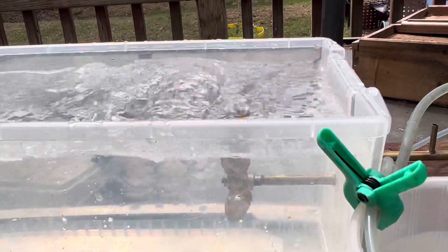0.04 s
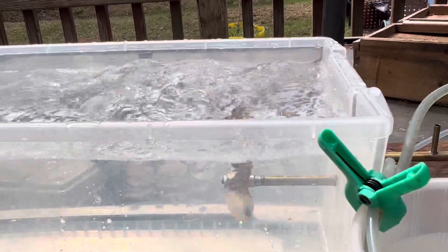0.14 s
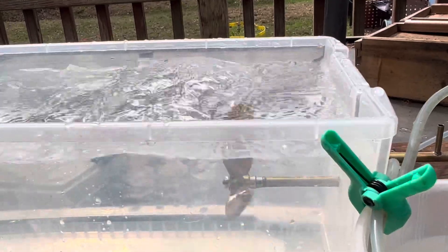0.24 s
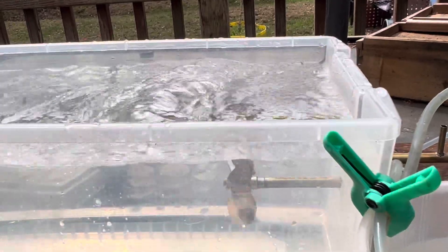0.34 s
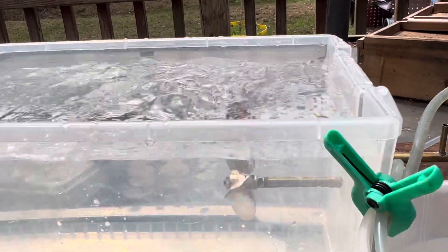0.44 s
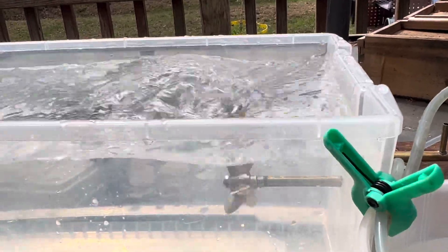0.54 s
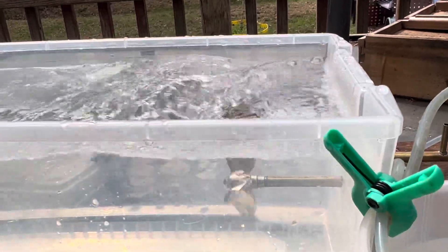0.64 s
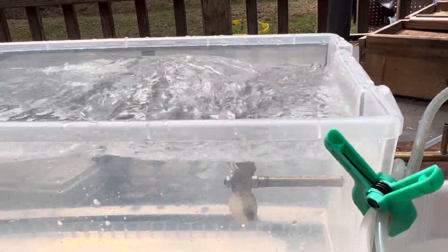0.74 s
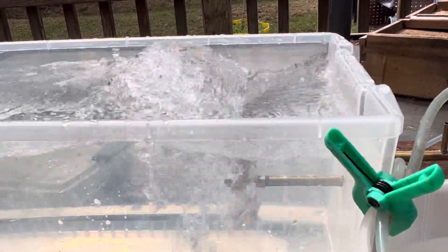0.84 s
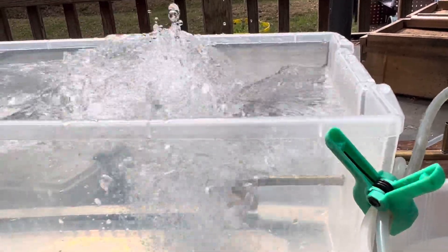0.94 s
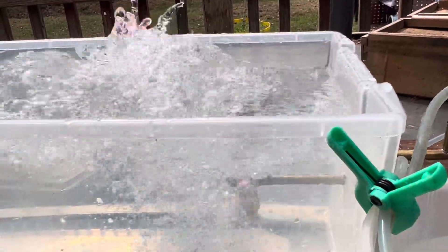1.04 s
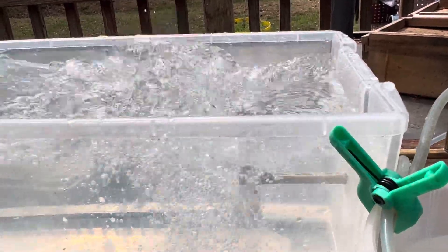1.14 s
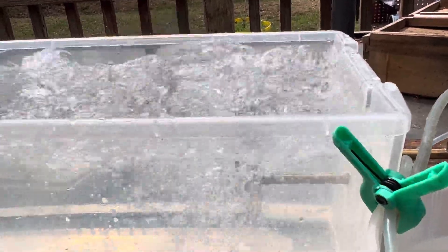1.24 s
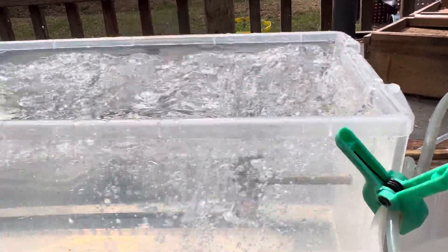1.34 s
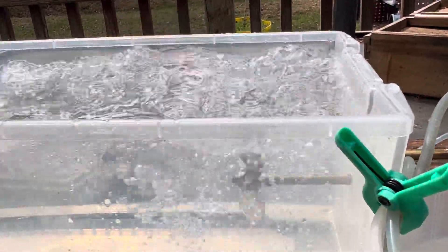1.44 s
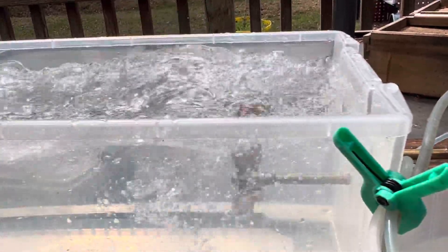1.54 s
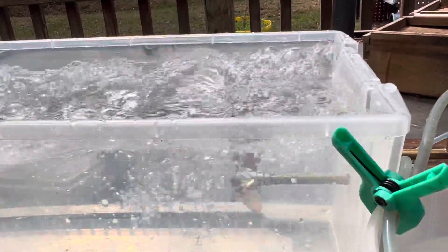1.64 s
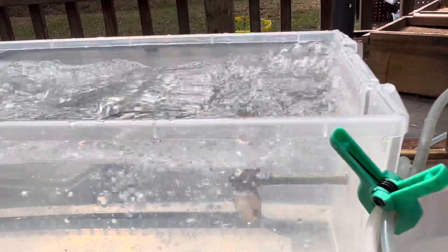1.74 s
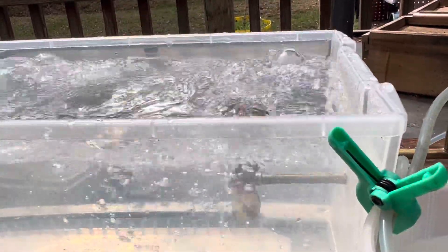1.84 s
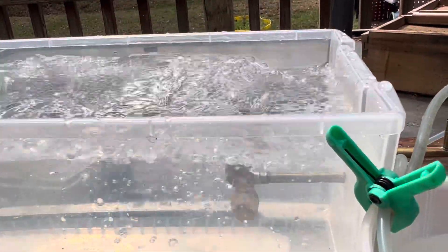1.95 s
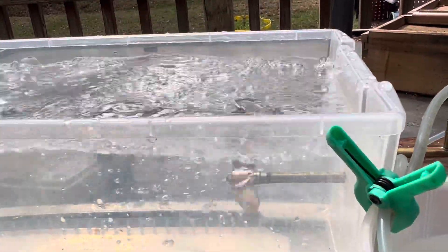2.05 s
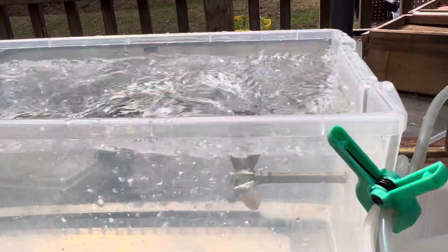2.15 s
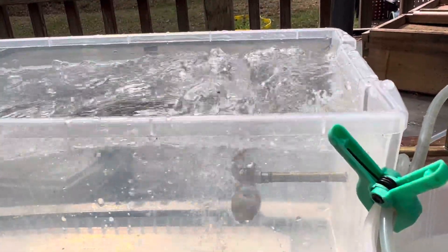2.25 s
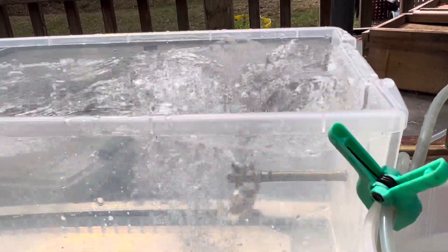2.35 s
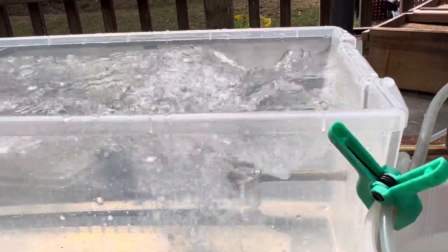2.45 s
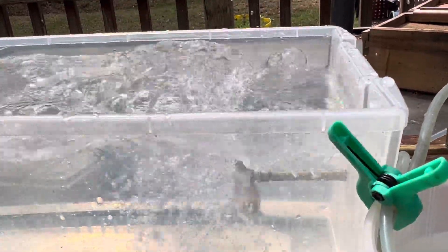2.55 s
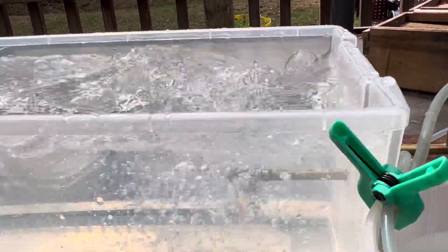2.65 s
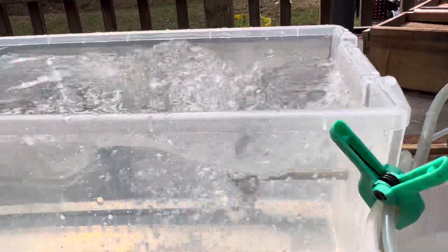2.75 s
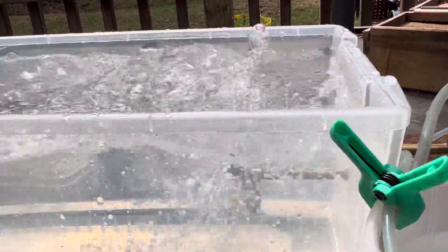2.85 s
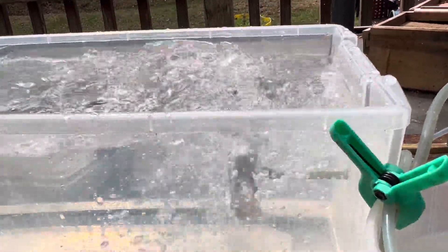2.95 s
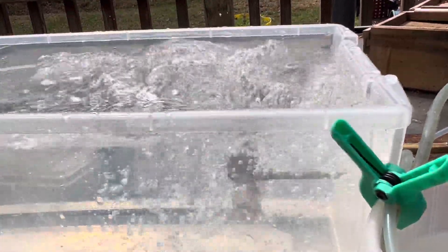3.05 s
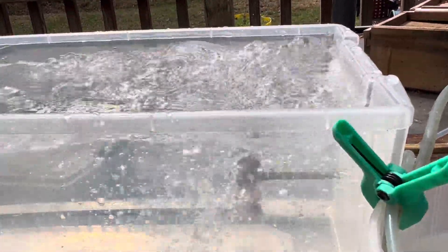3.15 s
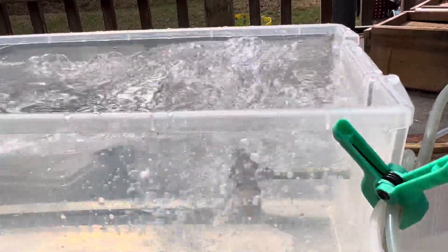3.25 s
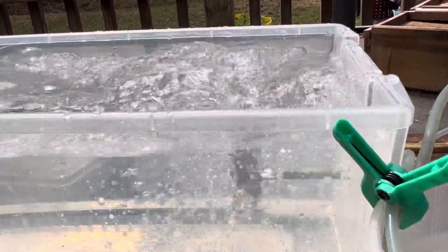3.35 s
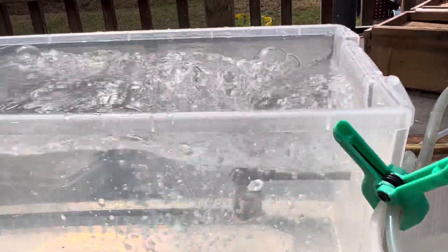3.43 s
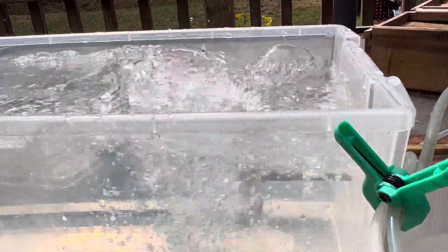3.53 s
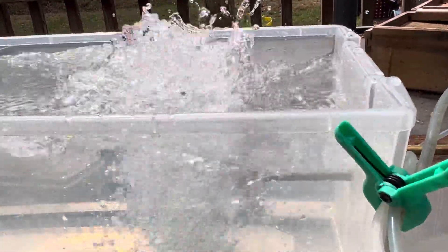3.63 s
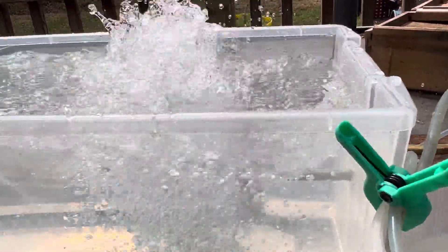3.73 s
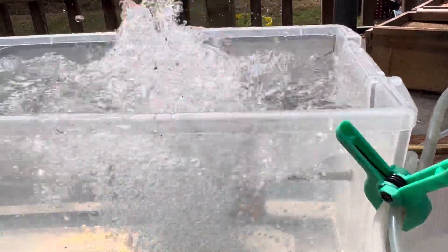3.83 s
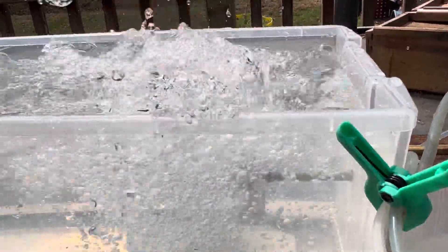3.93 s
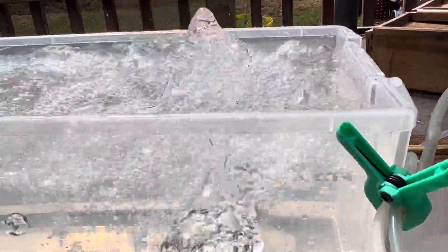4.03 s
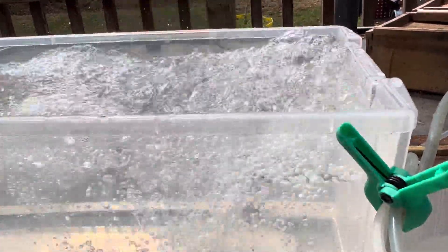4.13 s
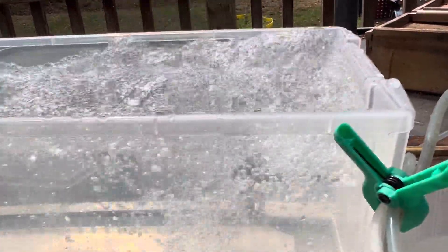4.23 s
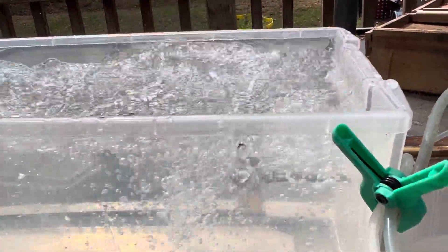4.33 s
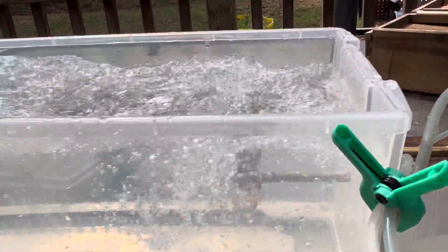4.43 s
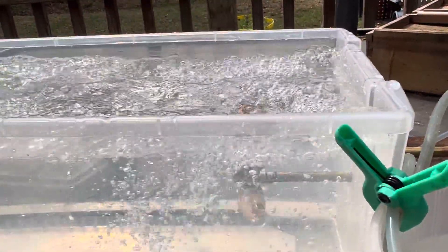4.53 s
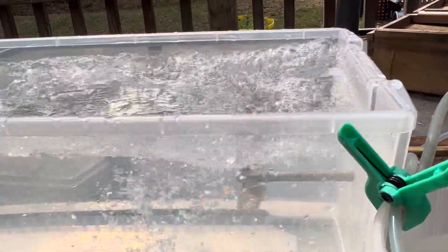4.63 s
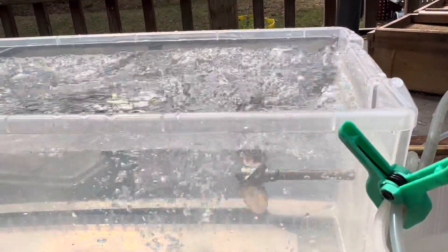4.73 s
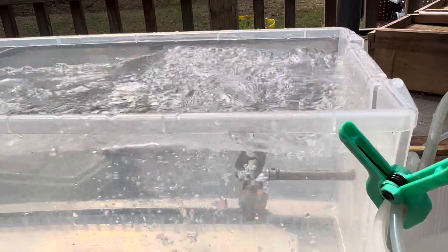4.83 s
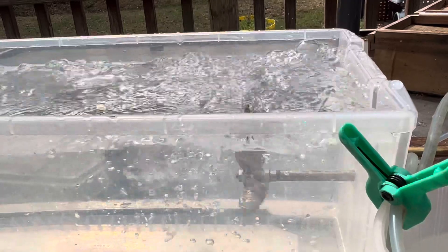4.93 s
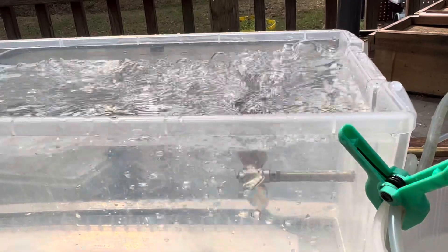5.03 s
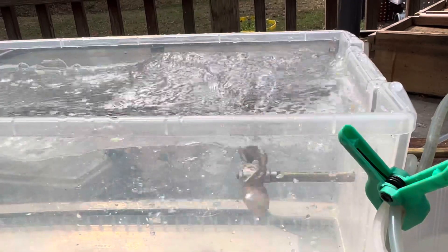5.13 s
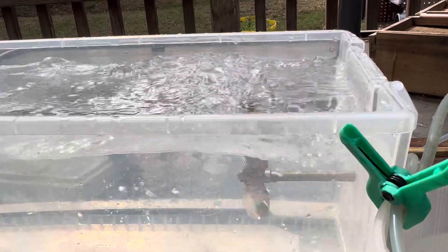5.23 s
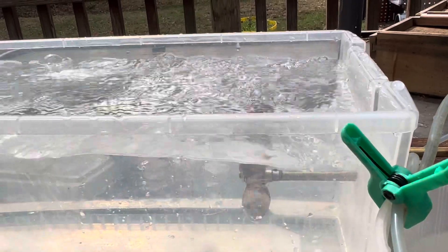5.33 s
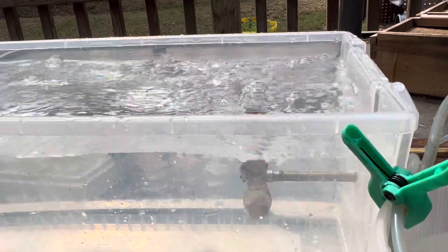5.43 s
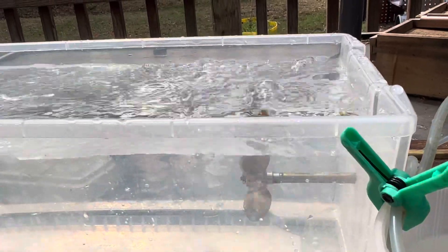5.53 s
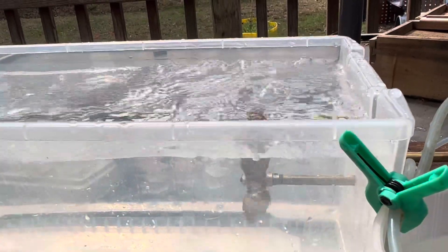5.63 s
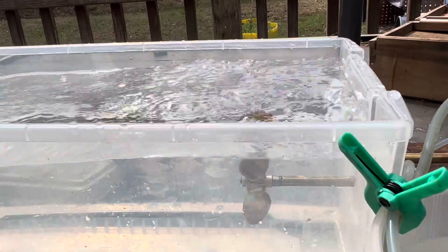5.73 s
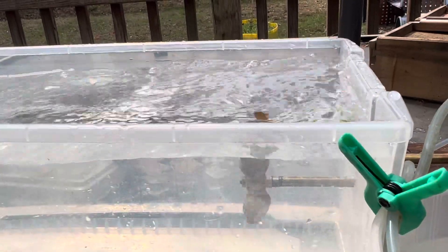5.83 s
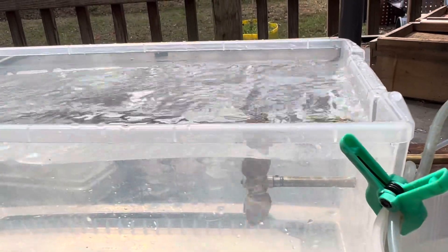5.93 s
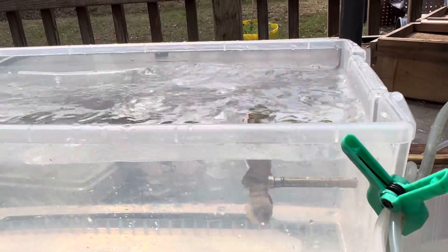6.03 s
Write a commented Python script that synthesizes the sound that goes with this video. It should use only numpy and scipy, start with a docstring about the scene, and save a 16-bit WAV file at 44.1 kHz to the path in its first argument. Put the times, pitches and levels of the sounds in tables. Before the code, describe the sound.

A small propeller turns underwater in a plastic tub, heard close up in a quiet yard. From the start its drive makes a low, fluttering thrum with rapid, light metallic ticks over faint ripples. At about 0.7 seconds the drive races and the water bursts into loud churning, with ringing bubbles, hollow pops and hissing spray, dying down by 1.4. A second splashing, gurgling surge runs from about 2.1 to 2.8 seconds. Deep sloshing thumps the tub walls around 3 seconds, leading into the biggest surge from 3.4 to 4, full of foam, gulps, a falling gurgle and heavy thuds. One more sharp, bright splash comes just after 4.1 seconds. From about 4.5 the water calms and the ticking softens, leaving a few droplets, small bubbles and a low wavering hum with the thrum until the end at about 6 seconds.

```python
"""Outdoors at a plastic tub of water, a two-port microphone close by.
A small propeller turns just under the surface; its drive thrums in the tub walls and ticks.
Three times the blades draw in air: the water churns with ringing bubbles, gulps as air pockets
close and throws spray, while sloshing thumps the tub. Faint ripples and hums lie behind it."""
import sys
import numpy as np
from scipy import signal
from scipy.io import wavfile
from scipy.ndimage import uniform_filter1d

SR = 44100
rng = np.random.default_rng(int(sys.argv[2]) if len(sys.argv) > 2 else 0)


def master(y):
    """Save y as 16-bit WAV."""
    cut = np.clip(np.atleast_2d(y).T, -1, 1)
    pcm = np.round(cut * 32767)  # scale
    wavfile.write(sys.argv[1], SR, pcm.astype(np.int16))


N = 268128
FOAM, SPRAY, BOOM = range(3)  # the three voices of a surge


def amp(db):
    """Decibels to gain."""
    return 10 ** (np.asarray(db) / 20)


def unit_rms(x):
    """Scales to rms 1."""
    return x / np.sqrt(np.mean(x ** 2) + 1e-20)


def at_hz(points, hz):
    """A table's value at the given frequencies, interpolated along a log axis."""
    f, value = np.transpose(points)
    return np.interp(np.log(hz + 1), np.log(f + 1), value)


def blur(grid, rows, columns):
    """Moving average along both axes."""
    return uniform_filter1d(uniform_filter1d(grid, rows, axis=0), columns, axis=1)


def add(mix, s, sound):
    """Mixes a sound in at s seconds."""
    part = mix[round(s * SR):][:len(sound)]
    part += sound[:len(part)]


def restless_noise(spectrum, size, patchy_db, flicker_db):
    """Coloured noise whose level wavers in local patches and flickers across all bands at once."""
    frames, hz = 4 * N // size + 5, np.fft.rfftfreq(size, 1 / SR)
    re, im, patches = rng.standard_normal((frames, len(hz), 3)).T
    patches = unit_rms(blur(patches, 5, 6))
    flicker = unit_rms(uniform_filter1d(rng.standard_normal(frames), size=4))
    gain = amp(at_hz(spectrum, hz)[:, None] + patchy_db * patches + flicker_db * flicker)
    return unit_rms(signal.istft((re + 1j * im) * gain, nperseg=size, noverlap=3 * size // 4)[1][:N])


def ring(hz, t60, rise_s, glide=0.0):
    """A dying tone with a soft start; with glide it climbs, as a bubble does nearing the surface."""
    t = np.arange(round(t60 * SR) + 2) / SR
    shape = (1 - np.exp(-t / rise_s)) * amp(-60 * t / t60)
    return shape / shape.max() * np.sin(2 * np.pi * hz * (t + glide * t ** 2 / t60))


def puff(white, low_hz, high_hz, t60, rise_s):
    """A quick burst of band noise."""
    band = signal.sosfilt(signal.butter(2, [low_hz, high_hz], "bandpass", fs=SR, output="sos"), white)
    t = np.arange(len(white)) / SR
    return unit_rms(band) * (1 - np.exp(-t / rise_s)) * amp(-60 * t / t60)


def bubbles(spectrum, low_hz, high_hz, per_s, cycles, spread_db, sizes):
    """A crowd of ringing bubbles of many sizes, a few much louder than the rest."""
    strength = amp(spread_db * np.minimum(rng.exponential(1, N), 5))
    births = strength * (rng.random(N) < per_s / SR)
    size, out = rng.integers(0, sizes, N), np.zeros(N)
    for k, hz in enumerate(np.geomspace(low_hz, high_hz, sizes)):
        grain = ring(hz, cycles / hz, rise_s=1 / hz, glide=0.1)
        grain *= amp(at_hz(spectrum, hz)) * np.sqrt(hz) / np.linalg.norm(grain)  # sizes are log-spaced
        out += signal.oaconvolve(births * (size == k), grain)[:N]
    return unit_rms(out)


def calm():
    """Rippling water and the yard, low behind everything."""
    # The background's colour. Each row: frequency in Hz, relative level in dB.
    spectrum = [(40, -5.5), (80, -4.5), (150, -1), (260, -4), (400, -11), (700, -20), (1200, -21),
                (2000, -20.5), (3000, -91), (4500, -37), (6300, -58), (9000, -34), (12500, -31.5),
                (15500, -33)]
    return amp(-49) * restless_noise(spectrum, size=1024, patchy_db=1.7, flicker_db=1.2)


def hums():
    """Faint low tones that fade in, waver and fade out."""
    # Each row: start and end in seconds, pitch in Hz, first and last rms level in dB.
    tones = [(4.6, 6.0, 84.2, -41, -48.5), (1.2, 2.5, 180, -54, -48), (5.0, 6.2, 194, -51.5, -50.5),
             (5.4, 5.6, 220, -55.5, -51), (4.5, 5.7, 250, -59.5, -53.5), (4.6, 7.3, 460, -64, -64)]
    t, out = np.arange(N) / SR, np.zeros(N)
    for start, end, hz, *db in tones:
        waver = unit_rms(uniform_filter1d(uniform_filter1d(rng.standard_normal(N), 1200), 1200))
        fade = np.clip(np.minimum(t - start, end - t) / 0.11, 0, 1)
        level = amp(np.interp(t, [start, end], db) + 2.5 * waver)
        phase = 2 * np.pi * hz * t + 0.15 * np.roll(waver, N // 2)
        out += np.sqrt(2) * level * fade * np.sin(phase)
    return out


def blade_passes():
    """The second of every blade pass: the drive races when the blades bite air and slows under load."""
    # The propeller's progress. Each row: time in seconds, blade passes so far.
    progress = [(.013, 0), (.354, 7), (.607, 13), (.689, 16), (.988, 29), (1.249, 38), (1.447, 42),
                (1.673, 46), (2.053, 52), (2.141, 55), (2.454, 69), (2.566, 74), (2.64, 77), (2.873, 85),
                (3.052, 90), (3.177, 93), (3.323, 97), (3.404, 100), (3.944, 127), (4.197, 135),
                (4.54, 143), (6.058, 172)]
    s, done = np.transpose(progress)
    return np.interp(np.arange(done[-1]), done, s)


def thrum():
    """Each blade pass knocks the tub wall, a little higher or lower and unevenly hard."""
    # Wall knocks that stand out. Each row: start in seconds, peak level in dB.
    loud_knocks = [(0.076, -34), (0.121, -41), (0.269, -37.5), (0.314, -34.5), (2.017, -33.5),
                   (4.365, -39.5), (4.414, -31), (5.06, -33)]
    wall_hz, lag_s, jitter_s = 261, 0.0061, 0.00418
    passes, out = blade_passes(), np.zeros(N)
    late, strength = rng.standard_normal((len(passes), 2)).T
    starts = (passes + lag_s + jitter_s * late).clip(0)
    knocks = list(zip(starts, -41 + 3 * strength)) + loud_knocks
    for (s, db), bend in zip(knocks, rng.standard_normal(len(knocks))):
        add(out, s, amp(db) * ring(wall_hz * (1 + 0.035 * bend), t60=0.0775, rise_s=0.006))
    return out


def ticks():
    """The drive ticks at each pass: a brief scrape rings the same small metal modes in a new mixture."""
    # The metal's modes. Each row: pitch in Hz, relative level in dB, seconds to fall 60 dB.
    modes = [(5300, -15.5, 0.015), (5665, -0.5, 0.011), (6344, 2, 0.0073), (6890, -4, 0.012),
             (7480, -2, 0.0049), (8160, 0, 0.006)]
    # Ticks grow louder as the drive races. Each row: time in seconds, typical peak level in dB.
    loudness = [(0, -49), (.55, -43), (.7, -31), (1.2, -41), (1.4, -44), (1.9, -42), (2.09, -30.5),
                (2.6, -33.5), (3.05, -38.5), (3.35, -33.5), (3.9, -33.5), (4.2, -39), (4.55, -47),
                (6.08, -56)]
    # Ticks that stand out. Each row: start in seconds, peak level in dB.
    loud_ticks = [(0.163, -32), (0.3543, -35), (0.522, -37), (1.1187, -32), (1.15, -28.5), (1.4467, -33),
                  (1.615, -33.5), (3.209, -33), (4.237, -28.5), (4.404, -35.5), (4.4445, -31), (6.058, -39)]
    scrape_s, jitter_s, spread_db = 0.0022, 0.0024, 2.5
    passes, out = blade_passes(), np.zeros(N)
    late, strength = rng.standard_normal((len(passes), 2)).T
    levels = np.interp(passes, *np.transpose(loudness)) + spread_db * strength
    starts = (passes + jitter_s * late).clip(0)
    for s, db in list(zip(starts, levels)) + loud_ticks:
        weights, bends, white = np.split(rng.standard_normal(600), [10, 20])
        age = np.arange(len(white)) / (scrape_s * SR)
        scrape = white * age * np.exp(-age)
        metal = np.zeros(2000)
        for (hz, mode_db, t60), weight, bend in zip(modes, weights, bends):
            mode = ring(hz * (1 + 0.012 * bend), t60, rise_s=0.000085)
            add(metal, 0, amp(mode_db + 1.8 * weight) * mode)
        tick = signal.oaconvolve(scrape, metal)
        add(out, s, amp(db) * tick / abs(tick).max())
    return out


def surge_gain(voice, lag_s=0):
    """Gain of foam, spray or boom: each surge breaks out, swells, holds, falls and trails off."""
    # Surges of churning. Each row: start, swell and hold in seconds, foam, spray and boom base in dB.
    surges = [(0.668, 0.0062, 0.1, -39, -57.5, -33.5), (0.755, 0.099, 0.051, -22.5, -46.5, -30),
              (1.072, 0.015, 0.1, -40.5, -55.5, -37.5), (2.079, 0.014, 0.0081, -42, -61, -32.5),
              (2.193, 0.02, 0.061, -25.5, -66, -52), (2.376, 0.087, 0.023, -27, -56, -34.5),
              (2.611, 0.074, 0.091, -29.5, -69, -40), (2.987, 0.034, 0.68, -41, -73, -40),
              (3.39, .01, 0.043, -30, -50.5, -49), (3.434, 0.026, 0.046, -25, -55, -35.5),
              (3.495, 0.12, 0.067, -22, -49.5, -25), (3.669, 0.066, 0.13, -25, -61, -28),
              (4.124, 0.0045, .005, -45, -49, -38), (4.544, 0.064, 0.037, -46, -63.5, -55)]
    ripple_db, fall_db_per_s = (-54.5, -66.5, -49.5)[voice], (86.5, 106, 72)[voice]
    t, power = np.arange(N) / SR - lag_s, amp(2 * ripple_db)
    for start, swell, hold, *base_db in surges:
        breakout = np.clip((t - start) / 0.005, 0, 1)
        swollen = np.clip((t - start) / max(swell, 1e-3), 0, 1)
        level = amp(base_db[voice] - 6.5 * (1.5 - swollen))
        after_s = np.maximum(t - start - swell - hold, 0)
        fall = amp(-fall_db_per_s * after_s) + amp(-15 - 12.5 * after_s)  # quick drop, slow tail
        power = power + (breakout * level * fall) ** 2
    return np.sqrt(power)


def slosh():
    """Heavy water thumping the walls, and trapped air booming under the surface just after the foam."""
    # The colours of the rumble and the boom. Each row: frequency in Hz, relative level in dB.
    rumble_spectrum = [(20, -47), (35, -19), (55, -3.5), (85, -13), (130, -13), (220, -40), (400, -102)]
    boom_spectrum = [(70, -56), (100, 35), (135, -1), (250, 9.5), (330, 1.5), (500, -29.5)]
    # The water's heaving. Each row: time in seconds, rumble level in dB.
    heave = [(0, -68), (.45, -51), (.7, -47), (.93, -52), (1.2, -52), (2.0, -50.5), (2.5, -38),
             (2.73, -33.5), (2.95, -33), (3.13, -23), (3.25, -40.5), (3.33, -28.5), (3.53, -38),
             (3.63, -31.5), (3.9, -40), (4.2, -39), (4.32, -41.5), (4.56, -37.5), (4.96, -49), (6.07, -49)]
    level = amp(np.interp(np.arange(N) / SR, *np.transpose(heave)))
    rumble = restless_noise(rumble_spectrum, size=2048, patchy_db=2.0, flicker_db=1.5)
    boom = restless_noise(boom_spectrum, size=1024, patchy_db=1.0, flicker_db=3.0)
    return level * rumble + surge_gain(BOOM, lag_s=0.032) * boom


def spray():
    """Fine hiss and the crackle of bursting droplets."""
    # The spray's colour. Each row: frequency in Hz, relative level in dB.
    spectrum = [(1500, -12), (3000, 7.5), (6000, 3.5), (9000, 8), (12500, 9), (15500, -37)]
    level = surge_gain(SPRAY)
    hiss = amp(4.0) * restless_noise(spectrum, size=128, patchy_db=-1.5, flicker_db=5.5)
    crackle = bubbles(spectrum, 2760, 15100, per_s=1600, cycles=9.9, spread_db=4.6, sizes=12)
    return level * (hiss + (level / amp(-76.5)) ** 0.44 * crackle)


def plunge():
    """A deepening air cavity, shaken by the falling water, rings ever lower."""
    start_s, length_s, first_hz, last_hz, width_hz = 3.5, 0.14, 557.5, 273, 74
    t, out = np.arange(0, length_s, 1 / SR), np.zeros(N)
    re, im = rng.standard_normal((N // 10, 2))[:len(t)].T
    pole = np.exp(-np.pi * width_hz / SR)
    shake = signal.lfilter([1 - pole], [1, -pole], re + 1j * im)
    turns = np.cumsum(first_hz * (last_hz / first_hz) ** (t / length_s)) / SR
    cavity = unit_rms((shake * np.exp(2j * np.pi * turns)).real)
    add(out, start_s, amp(-38) * np.sin(np.pi * t / length_s) ** 0.44 * cavity)
    return out


def splashes():
    """Sheets of water slap down in wide bursts; single droplets snap, short and very bright."""
    # Each row: start in seconds, level in dB, centre of the slap's band in Hz.
    slaps = [(0.676, -33.5, 4760), (0.7193, -33.5, 2780), (0.7785, -21, 3500), (0.837, -28.5, 3650),
             (0.851, -18.5, 1980), (0.9025, -17, 1710), (2.0957, -36, 4230), (2.191, -33, 3800),
             (2.204, -16, 1950), (2.2515, -24, 2140), (2.4041, -24, 2000), (2.476, -27.5, 3620),
             (2.6312, -31.5, 2060), (2.679, -29, 2484), (3.018, -35, 1900), (3.394, -25.5, 1050),
             (3.4189, -25.5, 3580), (3.4806, -24.5, 2270), (3.6504, -37, 2300), (3.8393, -31, 2880),
             (3.9393, -24.5, 2610), (4.121, -38, 2200), (4.137, -30, 3460), (4.148, -28.5, 2830),
             (5.185, -48.5, 4500)]
    # Each row: start in seconds, level in dB.
    droplets = [(0.2733, -36), (0.7698, -22), (0.7811, -14.5), (0.8525, -21), (0.9009, -26), (1.1982, -35),
                (2.191, -31), (2.2053, -16), (2.254, -14), (2.3845, -28), (2.4073, -22), (2.441, -20),
                (2.4564, -24), (2.4768, -20.5), (2.5671, -24), (2.6993, -27), (2.7245, -30), (2.7447, -31),
                (3.4188, -21), (3.582, -14), (3.6214, -31), (3.6795, -22), (4.136, -12.5), (4.1404, -15),
                (4.6423, -30), (4.6734, -44), (4.7092, -26), (5.361, -32), (6.007, -36)]
    out = np.zeros(N)
    for s, db, hz in slaps:
        white = rng.standard_normal(3000)
        add(out, s, amp(db) * puff(white, 0.5 * hz, 1.56 * hz, t60=0.047, rise_s=0.00052))
    for s, db in droplets:
        white = rng.standard_normal(1000)
        add(out, s, amp(db) * puff(white, 5500, 17000, t60=0.006, rise_s=0.0001))
    return out


def thuds():
    """Heavy lumps of water and air hit the walls with a low, short ring."""
    # Each row: start in seconds, peak level in dB, pitch in Hz.
    lumps = [(1.064, -24, 296), (1.102, -25.5, 300), (1.258, -27.5, 280), (2.684, -22, 91),
             (2.872, -22, 69), (3.071, -26, 48), (3.082, -17.5, 65.4), (3.3, -24, 71), (3.454, -15.5, 80),
             (3.686, -11, 256), (3.719, -19, 165), (3.796, -16, 248), (3.629, -15, 324), (3.639, -21, 75),
             (3.868, -17, 364), (4.167, -25, 63), (4.197, -23, 75)]
    out = np.zeros(N)
    for s, db, hz in lumps:
        add(out, s, amp(db) * ring(hz, t60=0.04 + 0.52 / hz, rise_s=0.81 / hz, glide=0.028))
    return out


def pops():
    """Air pockets collapse within a few cycles."""
    # Each row: start in seconds, peak level in dB, pitch in Hz.
    collapses = [(0.8535, -11.5, 950), (0.8568, -9.5, 814), (0.9035, -8.5, 870), (3.5733, -11.5, 587),
                 (3.6063, -9.5, 506), (3.651, -19, 900), (3.8243, -14.5, 690)]
    out = np.zeros(N)
    for s, db, hz in collapses:
        add(out, s, amp(db) * ring(hz, t60=4.5 / hz, rise_s=1 / hz))
    return out


def gulps():
    """An air pocket closes and rings as one large bubble in a gurgle of froth, shedding a smaller one."""
    # Each row: start in seconds, peak level of the large bubble in dB, its pitch in Hz.
    pockets = [(0.127, -41.5, 1220), (0.695, -37, 1190), (0.731, -32.5, 820), (0.754, -17, 1246),
               (0.774, -17, 1260), (0.779, -16.5, 1930), (0.787, -21, 1107), (0.805, -16, 960),
               (0.915, -25, 1110), (1.059, -23.5, 917), (1.1, -20.5, 1190), (1.23, -27.5, 433),
               (1.278, -36.5, 1170), (1.311, -32.5, 910), (2.205, -19.5, 1225), (2.202, -22, 920),
               (2.21, -21, 1800), (2.224, -25, 1280), (2.257, -20, 2590), (2.27, -24, 468),
               (2.283, -20.5, 1990), (2.294, -28, 1150), (2.308, -28, 1060), (2.362, -34, 2200),
               (2.403, -29, 1170), (2.444, -25.5, 550), (2.476, -22.5, 615), (2.49, -24.5, 407),
               (2.631, -22, 464), (2.728, -30, 876), (2.841, -35, 3670), (2.86, -32, 590),
               (2.976, -29, 1021), (3.124, -34.5, 925), (3.393, -21.5, 1044), (3.441, -20.5, 1460),
               (3.496, -19.5, 1155), (3.525, -19.5, 1950), (3.535, -22, 690), (3.586, -18.5, 470),
               (3.628, -17, 1120), (3.763, -25, 970), (3.844, -27, 524), (3.961, -24.5, 1360),
               (4.146, -25.5, 2150), (4.148, -16, 3470), (4.156, -22.5, 3230), (4.538, -38, 563),
               (4.566, -38, 593), (4.59, -40.5, 584), (4.883, -45, 1160), (5.082, -44, 1730)]
    out = np.zeros(N)
    for (s, db, hz), (higher, late) in zip(pockets, rng.random((len(pockets), 2))):
        bubble = ring(hz, t60=0.023 + 14 / hz, rise_s=0.72 / hz, glide=0.085)
        froth = puff(rng.standard_normal(2500), 0.49 * hz, 1.6 * hz, t60=0.048, rise_s=0.00084)
        shed = ring(hz * (1.17 + 0.47 * higher), t60=0.022, rise_s=0.002, glide=0.12)
        add(out, s, amp(db) * bubble)
        add(out, s, amp(db - 12) * froth)
        add(out, s + 0.0097 * late, amp(db - 12) * shed)
    return out


def churn():
    """Foam roar and the bubbles in it; the harder the churning, the more the bubbles stand out."""
    # The colour of foaming water. Each row: frequency in Hz, relative level in dB.
    spectrum = [(150, -3.5), (330, -0.5), (450, 0.5), (750, -4), (1250, -3), (1650, -11.5), (2100, -10.5),
                (3000, -11.5), (4200, -18), (6500, -14.5), (12500, -21.5)]
    level = surge_gain(FOAM)
    roar = amp(-5.0) * restless_noise(spectrum, size=256, patchy_db=4.0, flicker_db=3.0)
    crowd = bubbles(spectrum, 302.5, 4160, per_s=3000, cycles=21.6, spread_db=2.8, sizes=26)
    foam = level * (roar + (level / amp(-20.0)) ** 0.38 * crowd)
    return signal.sosfilt(signal.butter(4, 200, "highpass", fs=SR, output="sos"), foam)


def scene():
    """The tub at close range over the quiet yard, the same in both channels."""
    tub = calm() + thrum() + hums() + ticks() + slosh() + churn() + spray()
    tub += gulps() + pops() + thuds() + plunge() + splashes()
    return np.array([tub, tub])


def record(dry):
    """Two ports share the direct sound, phase-shifted, and catch opposite shares of the water's scatter."""
    # How alike the ports sound. Each row: frequency in Hz, likeness from 0 to 1.
    likeness = [(60, .95), (200, .9), (1200, .85), (1700, .3), (2100, .8), (3200, .75), (5200, .35),
                (6000, .4), (6600, .95), (7600, .6), (8800, .7), (9500, 1), (10700, 1), (11500, .7),
                (12600, 1), (14200, 1), (15200, .5)]
    # Phase between the ports. Each row: frequency in Hz, the right port's lead in radians.
    right_lead = [(100, 0), (400, .3), (800, -.6), (2000, -.7), (3500, -1.9), (5800, 1.5), (6200, 0),
                  (7000, 0), (9400, np.pi), (10800, np.pi), (12400, 2 * np.pi), (14300, 2 * np.pi),
                  (15500, 3 * np.pi)]
    # Balance. Each row: frequency in Hz, the left port's level over the right in dB.
    left_excess = [(350, 0), (600, 4), (2000, 0.7), (4500, 1.5), (8000, 0.96)]
    hz, _, spectra = signal.stft(dry, SR, nperseg=512, noverlap=384)
    re, im = rng.standard_normal(spectra.shape[:0:-1] + (2,)).T
    scatter = blur(re, 3, 5) + 1j * blur(im, 3, 5)  # drifts as the water moves
    scatter = scatter / np.sqrt(np.mean(abs(scatter) ** 2))
    alike = np.clip(at_hz(likeness, hz), 0, 1)[:, None]
    side = np.array([-1, 1])[:, None, None]  # left, right
    paths = np.sqrt((1 + alike) / 2) + side * np.sqrt((1 - alike) / 2) * scatter
    phase = np.exp(0.5j * side * at_hz(right_lead, hz)[:, None])
    balance = amp(-side * at_hz(left_excess, hz)[:, None] / 2)
    ports = signal.istft(spectra * paths * phase * balance, SR, nperseg=512, noverlap=384)[1][:, :N]
    low_cut = signal.butter(3, 38, "highpass", fs=SR, output="sos")  # small capsules lose deep bass
    high_cut = signal.firwin(511, 16000, window=("kaiser", 9), fs=SR)
    return signal.oaconvolve(signal.sosfilt(low_cut, ports), high_cut[None], "same")


dry = scene()
out = record(dry)
master(out)
```